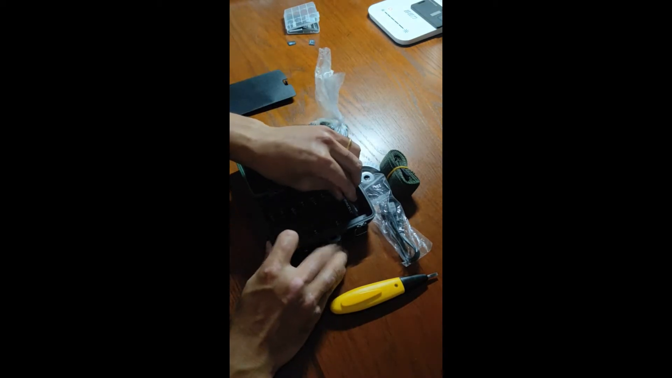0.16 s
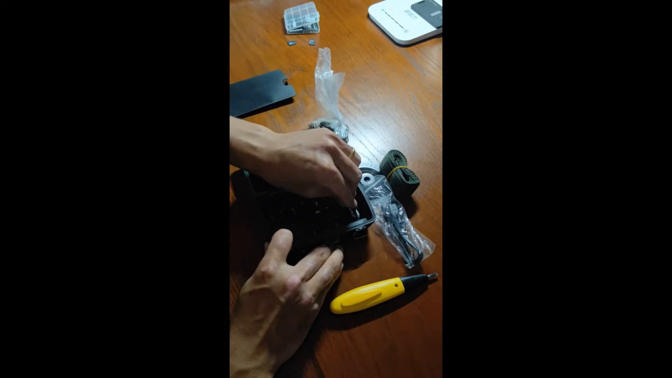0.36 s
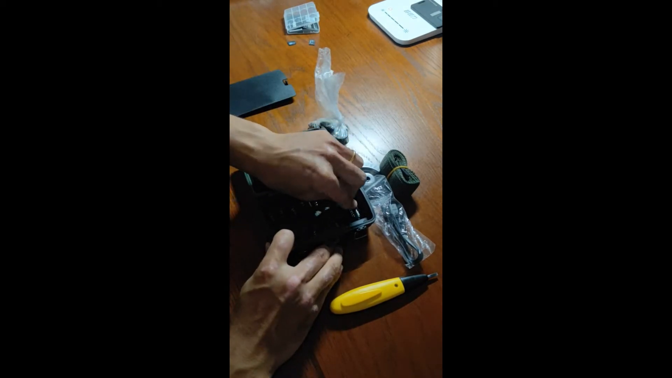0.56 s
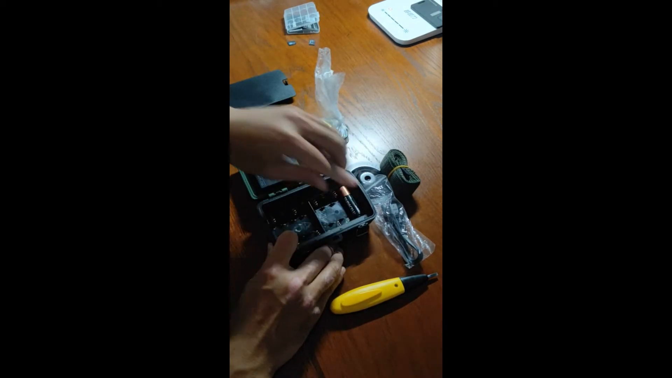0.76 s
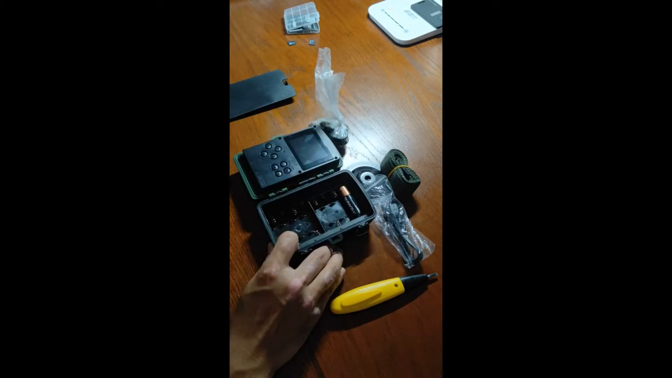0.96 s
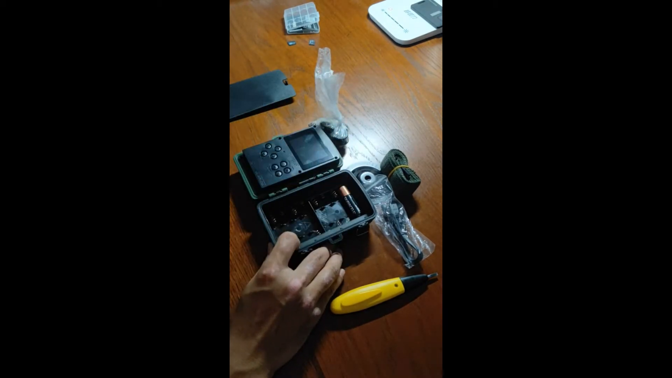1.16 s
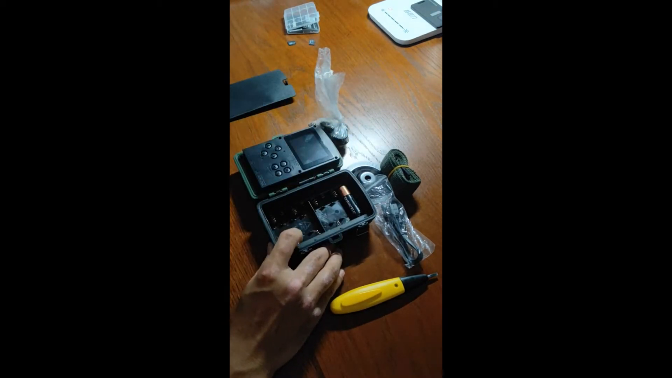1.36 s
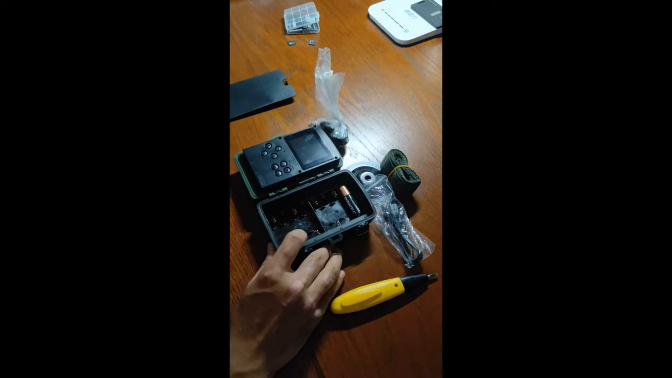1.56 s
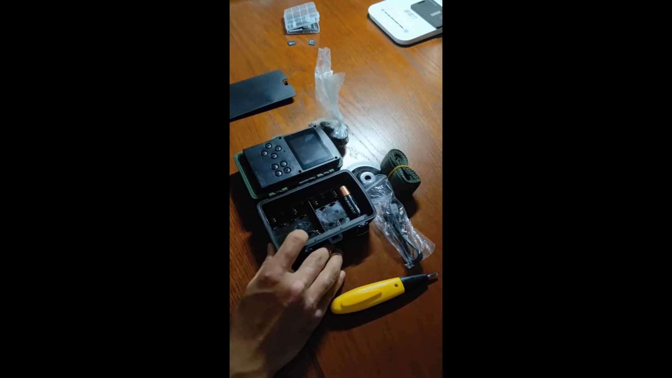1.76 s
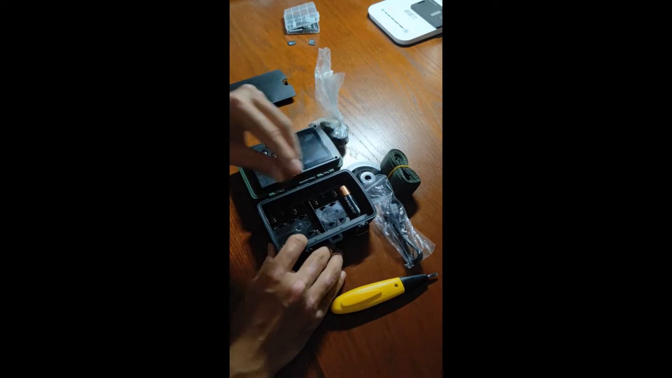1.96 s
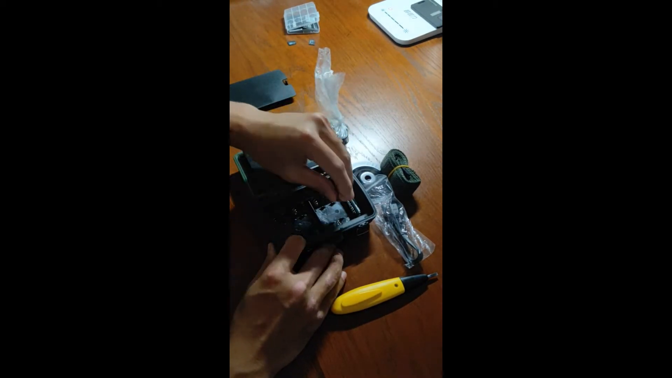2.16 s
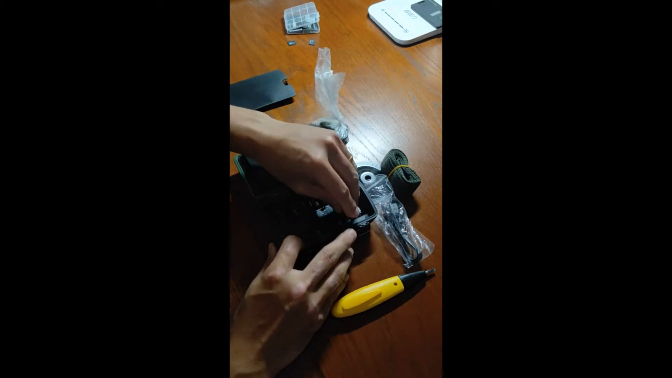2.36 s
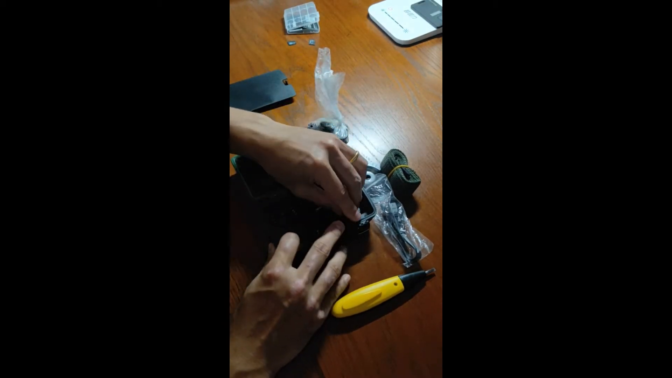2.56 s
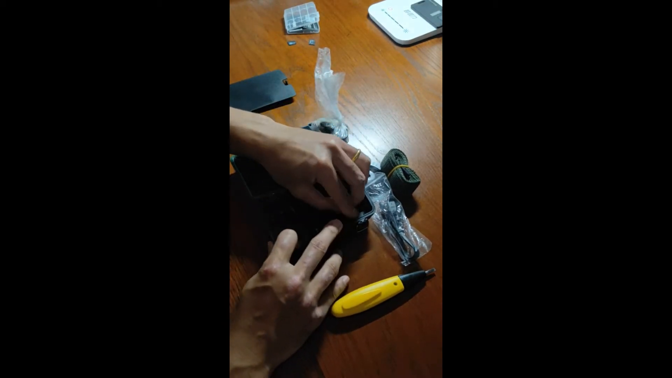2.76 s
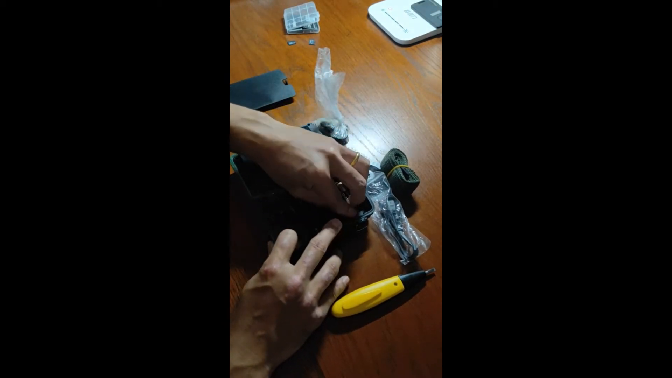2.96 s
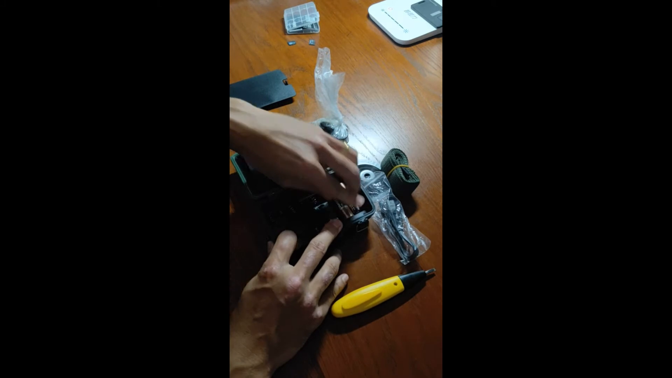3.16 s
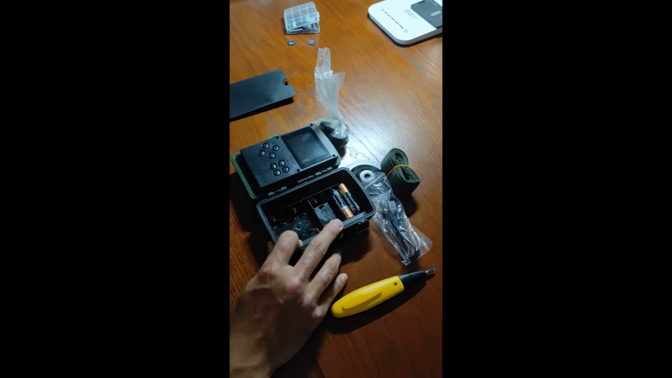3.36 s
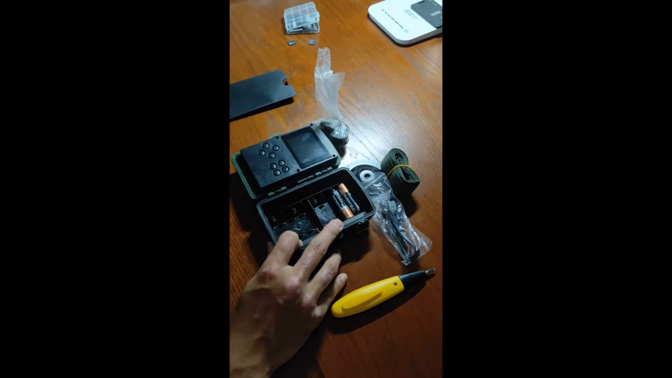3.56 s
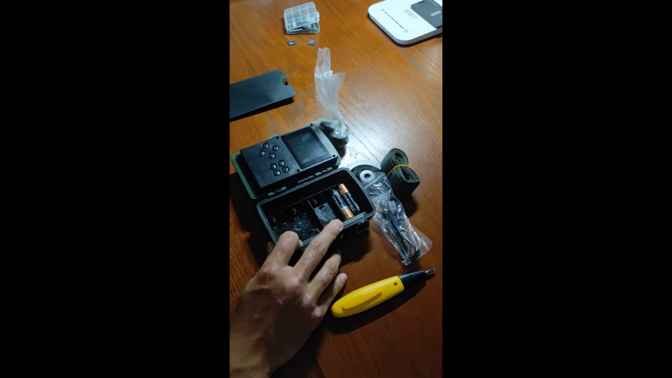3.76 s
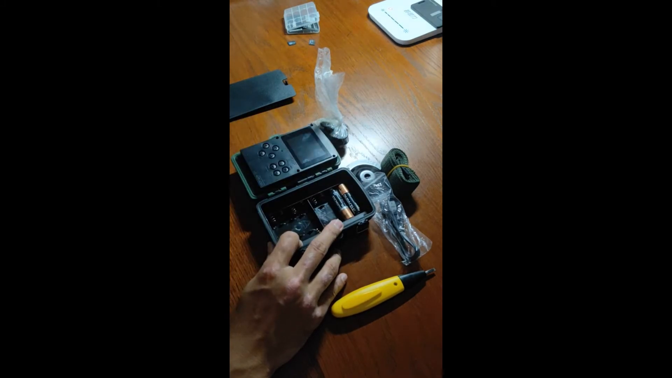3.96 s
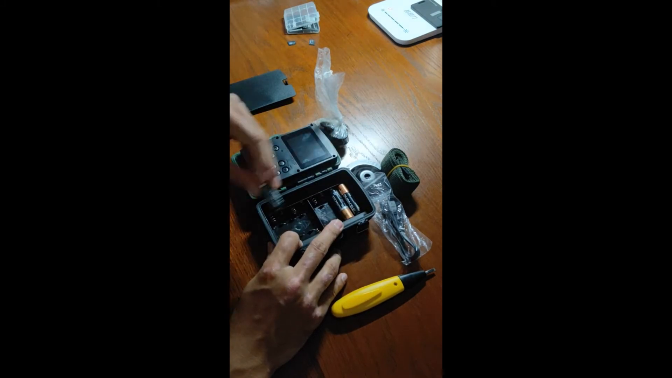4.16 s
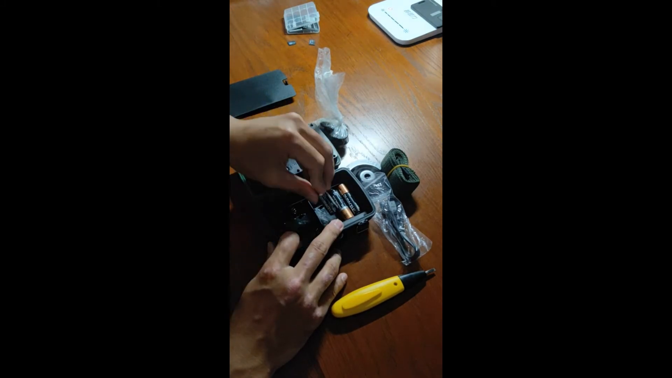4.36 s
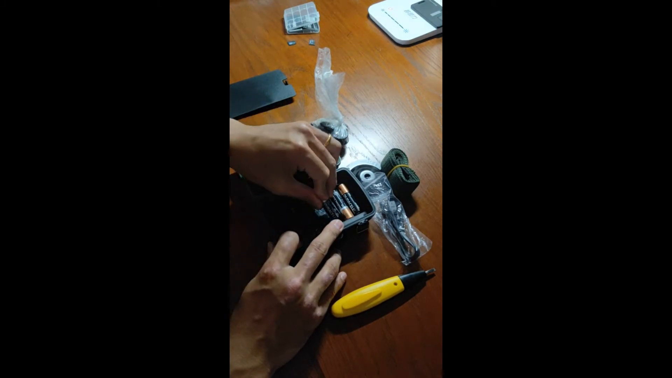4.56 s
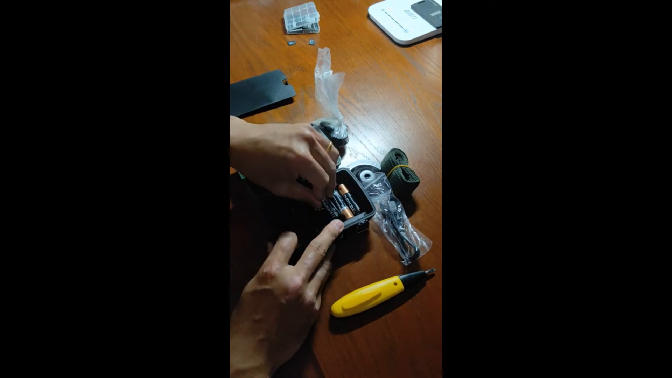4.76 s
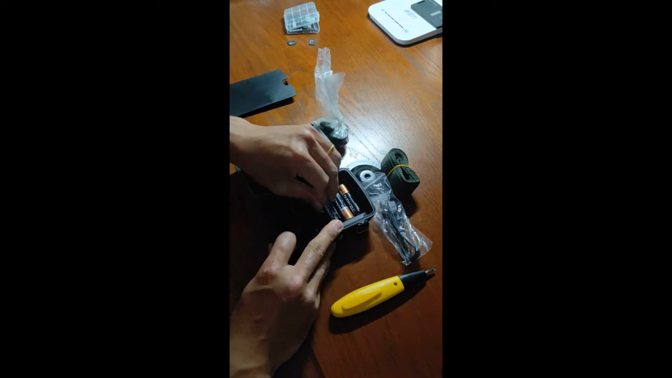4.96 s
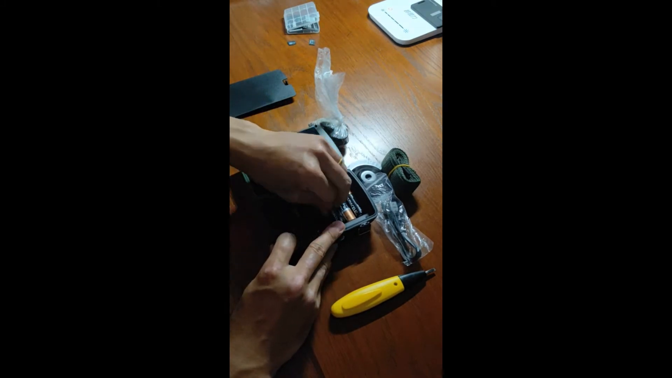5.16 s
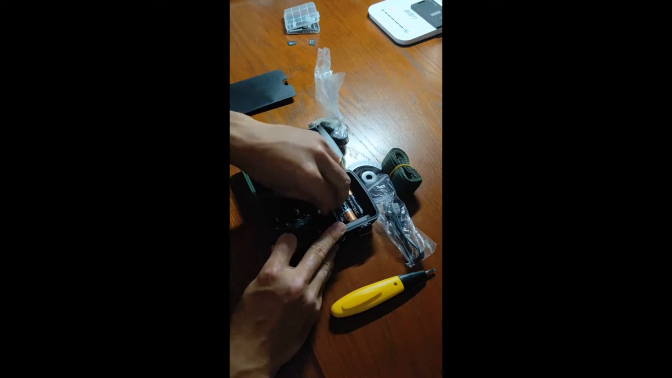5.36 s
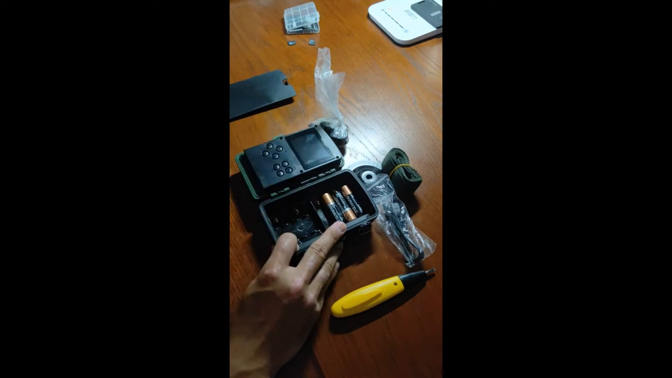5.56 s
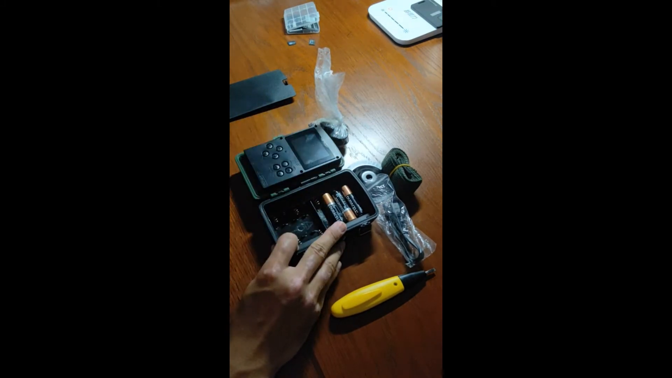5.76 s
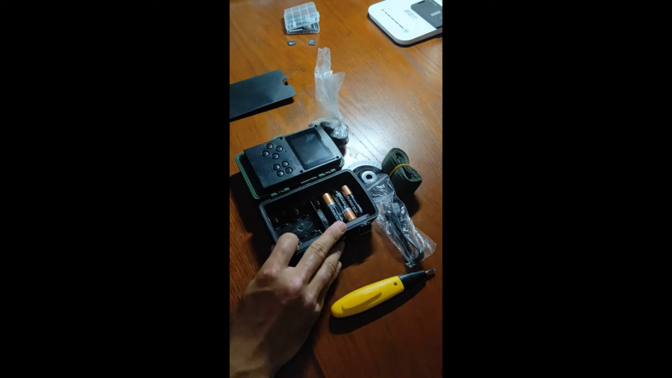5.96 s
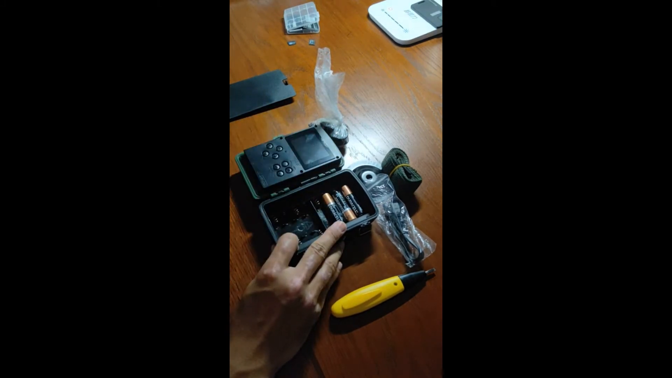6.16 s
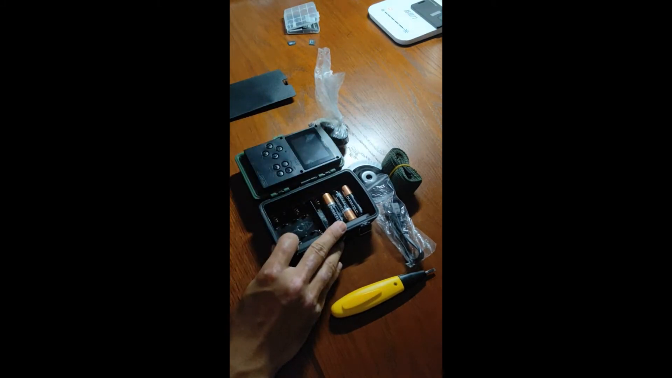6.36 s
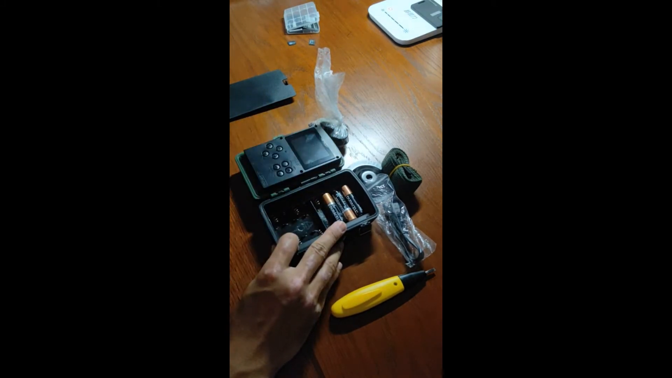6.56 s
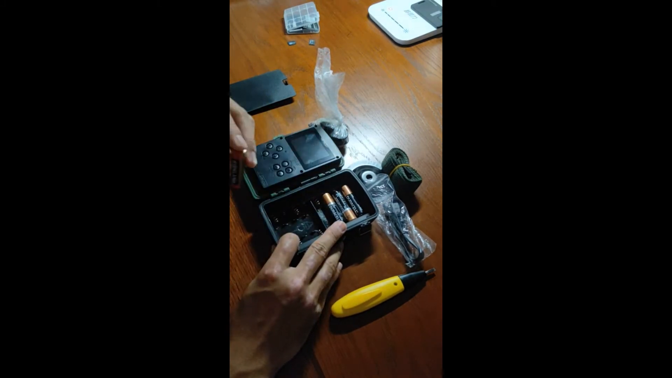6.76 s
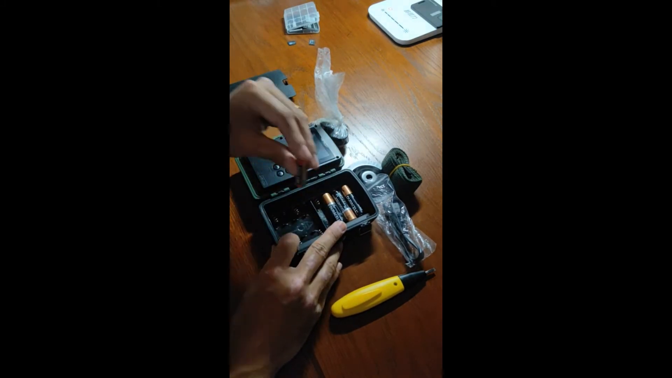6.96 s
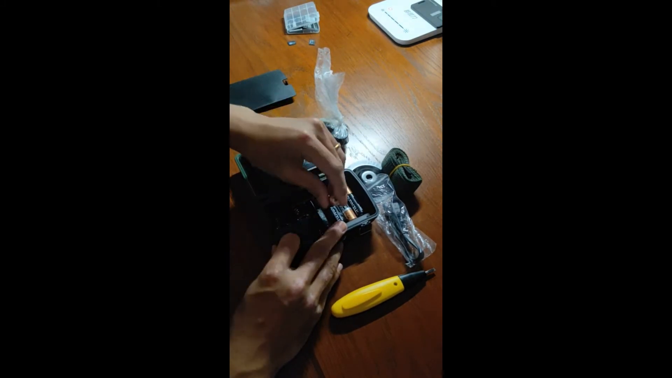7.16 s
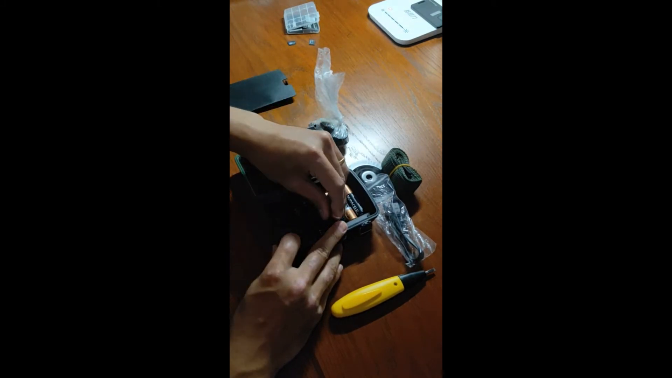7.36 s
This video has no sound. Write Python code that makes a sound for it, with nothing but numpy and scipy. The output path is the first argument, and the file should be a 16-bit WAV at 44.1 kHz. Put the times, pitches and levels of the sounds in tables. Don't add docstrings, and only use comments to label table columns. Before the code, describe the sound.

A quiet small room with low rumble, faint appliance hum and slight hiss, captured close in stereo with softened treble. From 0.1 to 0.45 s, a cell rattles into a hollow plastic case: a firm clack at 0.19, a duller knock at 0.42, with fingertip rubbing between. Faint touches around 0.6 and 1.6, otherwise nearly still until 2.2. Light nudges and rubs lead to clicks at 2.58 and 2.73, then the loudest event at 2.94: a hard, bright, stepped snap with a brief metallic ring and short room echo. Soft fumbling at 3.15, small clacks at 3.62 and 3.83, then quiet. From 4.5 to 5.1 several modest clicks and hollow knocks, strongest at 4.82 and 5.07. A low thump at 5.7, a small tick at 6.17, a pause, then two firm plastic clacks at 7.15 and 7.3.

```python
import sys
import numpy as np
from scipy import signal
from scipy.io import wavfile

SR = 44100
rng = np.random.default_rng(int(sys.argv[2]) if len(sys.argv) > 2 else 0)


def gain_from_db(level_db):
    decades = np.asarray(level_db, float) / 20
    return 10 ** decades


def wav_out(sig):
    wavfile.write(sys.argv[1], SR, np.round(np.clip(np.atleast_2d(sig).T, -1, 1) * 32767).astype(np.int16))


N = 326781

# (pitch [Hz], level [dB])
HUM = [(118.4, -71), (242.2, -85.5), (312.2, -90), (441.4, -81.5)]
# (pitch [Hz], level [dB per Hz])
AIR = [(12, -30), (20, 5.5), (74, 0), (126, -13.5), (146, -4), (174, -13.5), (236, -13), (380, -14.5),
       (442, -16.5), (502, -19.5), (851, -19), (1370, -28.5), (7050, -33.5), (8200, -28.5), (10700, -77),
       (18000, -120)]
AIR_DB = -67.5
# (pitch [Hz], likeness [0 to 1])
AIR_LIKENESS = [(40, 0.18), (120, 0.92), (300, 0.19), (430, 0.63), (620, 0.71), (1000, 0.041),
                (8000, 0.0086)]
# (pitch [Hz], likeness [0 to 1])
NEAR_LIKENESS = [(30, 0.21), (60, 1), (130, 0.99), (400, 0.93), (520, 0.58), (700, 0.21), (8000, 0.0079)]
PORT_LAG_CYCLES = 0.32
# (pitch [Hz], time to fall 60 dB [s], level [dB])
ROOM = [(98.4, 0.59, -18), (400, 0.33, -13), (1120, 0.42, -10.5), (2430, 0.3, -8), (6490, 0.37, -8.5)]

# (strongest at [s], press level [dB], skin slide level [dB], length [s])
STROKES = [(0.182, -67.5, -78.5, 0.1), (0.309, -54.5, -82, 0.19), (0.632, -58.5, -80, 0.083),
           (1.58, -71, -93, 0.72), (2.206, -54.5, -70, 0.043), (2.35, -61.5, -93, 0.14),
           (2.588, -61, -80, 0.2), (2.883, -63.5, -91.5, 0.22), (3.209, -61, -74.5, 0.13),
           (3.608, -52, -83.5, 0.033), (3.754, -65.5, -83.5, 0.23), (4.535, -70, -77.5, 0.1),
           (4.899, -62, -87.5, 0.49), (5.095, -51, -70, 0.093), (5.321, -66, -96, 0.14),
           (5.848, -66.5, -87, 0.52), (6.21, -62, -90, 0.12), (7.347, -54.5, -78.5, 0.086)]
RISE_DB, EASE_DB = 13, 13
# (pitch [Hz], level [dB], time to fall 60 dB [s])
RIBS = [(1612, -31, 0.012), (1895, -41, 0.036), (2700, -37, 0.0037), (3490, -31.5, 0.0092),
        (4800, -50, 0.008)]

# (time [s], treble level [dB], dullness [dB], bright spot [Hz])
CLICKS = [(.116, -62.5, -6.5, 5800), (0.178, -58, 4, 2250), (.187, -46, -1, 1700), (0.247, -55.5, -9, 5800),
          (0.4211, -42, -9.5, 5400), (.432, -69, -5, 5860), (0.608, -73, -6, 6940), (2.203, -81, 15, 1700),
          (2.225, -68, 2, 2320), (2.328, -70, -3, 5840), (2.576, -50.5, -5, 1600),
          (2.5814, -48.5, -7.5, 6900), (2.714, -58, -4.5, 7340), (2.7274, -48.5, -10.5, 5960),
          (2.9367, -26.5, -13.5, 7700), (2.9385, -24, -4.5, 4500), (2.9415, -30, -10, 5900),
          (2.95, -39, 3.5, 5300), (2.96, -42, -1, 5694), (3.609, -52, -19.5, 4180), (3.618, -45, -12, 6620),
          (3.833, -61, -2, 2010), (4.473, -72.5, 1.5, 6420), (4.512, -57, -5.5, 7840),
          (4.62, -63, -6, 3600), (4.744, -85, 6, 2000), (4.849, -63.5, -2, 3200), (4.922, -63.5, -10, 4500),
          (4.997, -72, -10, 6500), (5.0158, -66, -5, 5500), (4.632, -52, -14.5, 3640),
          (4.8147, -50.5, 7.5, 1550), (4.93, -64, 3.5, 3000), (5.053, -47.5, -4, 2640),
          (5.072, -36, -12, 6650), (5.083, -53, -4, 5220), (6.173, -49.5, -4, 2346),
          (7.1528, -44.5, -3.5, 5500), (7.162, -61, -15, 7000), (7.3038, -51.5, 1.5, 1760)]
CLICK_T60_S, SOFT_T60_S, SOFT_BELOW_DB = 0.034, 0.056, -48
AWAY_DB, KEEN_HZ = -14, 3330
SPOT_ROOM_SHARE = 0.4

# (time [s], level [dB], pitch [Hz])
STEEL = [(0.33, -76, 5800), (0.42, -44, 5350), (2.33, -64, 5700), (2.3, -66, 6400), (2.725, -38, 6300),
         (2.727, -35, 5940), (2.9385, -22, 4550), (2.9405, -23, 7500), (2.9415, -27, 5900),
         (7.153, -45, 6600), (7.153, -43.5, 3500), (7.154, -47, 1740), (7.167, -56, 5000),
         (3.617, -56, 1560), (3.835, -60, 1800), (2.65, -56, 1030), (4.817, -52, 3500), (2.6, -46, 7400),
         (.1885, -43, 1100), (.19, -42, 700), (.4225, -33, 380), (1.96, -66, 1590), (2.22, -61, 4800),
         (2.468, -61, 670), (2.7, -62, 705), (2.94, -39, 1400), (3.2, -57, 580), (3.66, -58, 540),
         (3.8345, -37.5, 567), (4.817, -45, 1940), (5.692, -51, 535), (5.739, -53, 1110),
         (2.949, -29, 5330), (7.153, -44, 5400), (7.3045, -40, 1750), (7.306, -48, 2400),
         (4.775, -79.5, 6450), (5.2, -71, 6450), (4.82, -54.5, 6100), (7.307, -54, 6700),
         (3.619, -44.5, 5000), (3.618, -35.5, 6740), (4.512, -50.5, 7540), (4.632, -45.5, 3530),
         (4.816, -47, 2300), (4.8155, -33.5, 1510), (5.075, -41, 1470), (6.175, -67.5, 2480),
         (6.198, -52, 6900), (6.255, -69, 7000), (7.309, -38.5, 316), (7.154, -46.5, 330),
         (4.819, -40, 440), (4.826, -42, 430), (.4225, -56, 4500), (6.174, -53, 4750), (4.936, -45, 440),
         (.56, -56, 680)]
STEEL_T60_S, STEEL_ROOM_DB = 0.023, -8.5
PANEL_CYCLES, SWELL_CYCLES = 35, 1.6

LATCH_S = [
    2.9391,
    2.9406,
    2.9477,
    2.9534,
]
LATCH_DB = [
    -36,
    -25.5,
    -34,
    -38.5,
]
# (pitch [Hz], level [dB], time to fall 60 dB [s])
LATCH_MODES = [(263, -11.5, 0.037), (130.8, -12.5, 0.03), (418.6, 1.5, 0.064), (694, -4, .055),
               (735, -6, 0.056), (800, -8, .05), (860, -4, 0.05), (975, -4, 0.04146), (1174, -6, 0.02),
               (1276.4, -4.5, .03), (2000, -16, .02), (2280, -16, 0.022)]

# (time [s], strength [dB], weight passed down [dB], hardness [dB], struck spot [Hz])
BLOWS = [(0.123, -58.5, 9.5, -3, 465), (.18, -43.5, 9, -6, 298), (.188, -27.5, -5.5, -7, 977),
         (.215, -45, -1.5, -11, 1000), (0.248, -52, -2, 7, 340), (.422, -31.5, -10, -14, 420),
         (2.275, -49, 2.5, -13, 315), (2.576, -35.5, -3.5, -16, 356), (2.725, -44.5, 6.5, -9, 400),
         (2.9385, -47, -1.5, 3, 706), (2.941, -39.5, 4.5, -15, 420), (2.963, -32, -1, -20, 910),
         (3.042, -42.5, -18, -6, 789), (3.614, -51.5, 1.5, -6.5, 581), (3.835, -49.5, -4, -8, 540),
         (4.513, -53.5, 8.5, -10.5, 316), (4.636, -45.5, 2.5, -16.5, 324), (4.8144, -38.5, -5.5, -5, 437),
         (5.054, -42, -5, -3, 433), (5.075, -35, -7, -4, 435), (5.691, -48, 10, -23, 149.2),
         (6.174, -48, -4.5, -5.5, 542), (7.153, -39, -4, -21.5, 338.4), (7.305, -37, -5.5, -13.5, 320)]
# (time [s], strength [dB], weight passed down [dB], struck spot [Hz])
NUDGES = [(.1, -58.5, 2, 600), (0.147, -59, 5, 300), (0.173, -54, 4, 236), (2.59, -48.5, 4, 347),
          (2.738, -49.5, 2, 238.6), (4.824, -47.5, -2, 426), (.55, -68.5, 13.5, 374),
          (0.611, -60.5, 1, 790), (1.559, -65, -8, 590), (1.621, -62, -17, 566), (2.193, -68, 8, 600),
          (2.205, -56, 5, 580), (2.326, -57, 4, 306), (2.34, -56, 6, 540), (0.444, -50, 7.5, 670),
          (2.467, -59.5, -1.5, 420), (2.515, -60, 5, 430), (2.61, -59, 9.5, 294), (2.713, -52, -3, 417),
          (2.905, -62, 4, 860), (3.153, -46, 2.5, 689), (3.181, -48.5, -4.5, 301.4),
          (3.632, -45.5, -1.5, 610), (3.655, -48.5, -0.5, 584), (3.684, -73, 24, 428.3),
          (4.472, -66.5, 10, 315), (4.715, -59, 4, 442), (4.748, -62.5, -0.5, 530), (4.858, -45, 1, 480),
          (4.931, -45.5, -6, 445), (5.016, -59, 2, 600), (5.329, -53, -3, 438), (5.363, -60.5, 8, 420),
          (5.705, -52, 13, 302.5), (5.738, -48, -1, 312), (0.202, -51, 0.5, 670), (.232, -48.5, 4, 700),
          (.268, -52.5, 4, 890), (.282, -56.5, 1.5, 300), (.306, -53.5, -4.5, 800), (2.255, -63, 6, 430),
          (2.303, -60.5, 1.5, 310), (2.407, -62.5, 3, 400), (2.442, -59, 3.5, 430), (2.548, -69, 3, 504),
          (3.675, -55.5, 8, 303), (3.702, -56.5, 6.5, 563), (3.809, -65, 1.5, 705),
          (5.698, -54.5, -0.5, 560)]
NUDGE_HARDNESS_DB, NUDGE_TICK_DB = -15.5, -24
RATTLE_S, RATTLE_DB = 0.006, -8
GRIP_DETUNE = 0.02
TABLE_SHARE, TABLE_DB, HOLLOW_SHARE, HOLLOW_DB = 1.3, -17.5, 0.88, -10
# (pitch [Hz], level [dB], time to fall 60 dB [s])
TABLE = [(61.5, -11, 0.48), (88.5, -6, 0.2), (128.5, 4.5, 0.16), (139, -1, 0.26), (209.5, -1.5, 0.2),
         (231, -1.5, 0.18)]
# (pitch [Hz], level [dB], time to fall 60 dB [s])
HOLLOW = [(305.7, -4, 0.15), (349.8, -1.5, 0.089), (398, -5, 0.052), (420, -1.5, 0.053), (445, -4.5, 0.11)]
# (pitch [Hz], level [dB], time to fall 60 dB [s])
CASE = [(530, -9.5, 0.094), (587, 0, 0.069), (651, -4.5, 0.064), (707, -3.5, 0.084), (790, -1, 0.061),
        (898, -7, 0.066), (952, -6, 0.055)]
# (pitch [Hz], level [dB], time to fall 60 dB [s])
SHELL = [(1113.6, -6.5, 0.035), (1255, -7, 0.016), (1320, -2, 0.0056), (1468, -4.5, 0.021)]

CUTOFF_HZ, SPILL_DB, HISS_DB = 8750, -57, -100


def at_hz(points, hz, column=1):
    points = np.array(points)
    return np.interp(np.log(hz), np.log(points[:, 0]), points[:, column])


def rms_one(x):
    return x / np.sqrt(np.mean(x ** 2) + 1e-20)


def drift(rate):
    r = np.exp(-80 * np.pi * rate / SR)
    slow = signal.lfilter([1], [1, -2 * r, r * r], rng.standard_normal(N // 40 + 2002))[2000:]
    return np.interp(np.arange(N) / 40, np.arange(len(slow)), rms_one(slow))


def ring(push, hz, t60):
    r = np.exp(-np.log(1000) / (t60 * SR))
    w = 2 * np.pi * hz / SR
    return signal.lfilter([0, np.sin(w)], [1, -2 * r * np.cos(w), r * r], push + 1e-18)


def butter(x, order, hz, kind="low"):
    return signal.sosfilt(signal.butter(order, hz, kind, fs=SR, output="sos"), x)


def spread(mid, side, hz, likeness):
    alike = np.clip(at_hz(likeness, hz), 0, 1)
    return np.sqrt(1 + alike) * mid + np.sqrt(1 - alike) * side * [[1], [-1]]


def ports(mid, side, hz):
    late_side = np.roll(side, int(PORT_LAG_CYCLES * SR / hz))
    return spread(mid, late_side, hz, NEAR_LIKENESS)


def bands(likeness, size):
    edges = 18 * 2 ** np.arange(0, 9.1, 0.5)
    white = rng.standard_normal((2, 2, size))
    for k, (low, high) in enumerate(zip(edges, edges[1:])):
        centre_hz = np.sqrt(low * high)
        mid, side = butter(white[k % 2], 2, [low, high], "band")
        yield centre_hz, spread(mid, side, centre_hz, likeness)


def background():
    out, t = 0, np.arange(N) / SR
    for hz, noise in bands(AIR_LIKENESS, size=N):
        lumps_db = 9.5 * np.tanh(drift(5.4)) / (1 + hz / 150)
        out = out + noise * gain_from_db(at_hz(AIR, hz) + lumps_db)
    out = rms_one(out) * gain_from_db(AIR_DB + 2.0)
    for hz, db in HUM:
        turn = 2 * np.pi * hz * t + 0.51 * drift(1.5)
        out += np.sqrt(2) * gain_from_db(db + 0.97 * drift(5.3)) * np.sin(turn)
    return out


def room(x):
    t = np.arange(int(0.6 * SR)) / SR
    echo = 0
    for hz, noise in bands(NEAR_LIKENESS, size=len(t)):
        t60 = at_hz(ROOM, hz)
        fall = gain_from_db(at_hz(ROOM, hz, column=2) - 60 * t / t60)
        echo = echo + noise * fall / np.sqrt(t60 * SR / 14)
    echo = echo * np.clip((t - 0.004) / 0.0045, 0, 1)
    return signal.fftconvolve(x, echo, axes=1)[:, :N]


def hands():
    t, power = np.arange(N) / SR, 0
    for s, press_db, slide_db, length in STROKES:
        lengths = (t - s) / length
        swell = gain_from_db(np.minimum(RISE_DB * lengths, -EASE_DB * lengths))
        power = power + swell ** 2 * gain_from_db([[press_db], [slide_db]]) ** 2
    return np.sqrt(power)


def skin_hiss(slide):
    skin = butter(rng.standard_normal((2, N)), 2, 1500, "high")
    walls = sum(gain_from_db(db) * ring(skin, hz, t60) for hz, db, t60 in RIBS)
    return rms_one(skin + 0.24 * walls) * slide * gain_from_db(5.5 + 2 * drift(30))


def clicks():
    out, t = np.zeros((3, N)), np.arange(SR // 10) / SR
    ranges_hz = [(4000, 9500), (1500, 2600), (2600, 4000)]
    nudge_ticks = [(s, db + NUDGE_TICK_DB, 4.0, 1800) for s, db, *_ in NUDGES]
    for s, top_db, dull_db, spot_hz in CLICKS + nudge_ticks:
        away_db = AWAY_DB * (1 - np.exp(-(np.log(spot_hz / KEEN_HZ) / 0.23) ** 2))
        levels_db = top_db, top_db + dull_db, top_db + 0.5 * dull_db + away_db
        soft = 1 / (1 + gain_from_db(max(top_db, top_db + dull_db) - SOFT_BELOW_DB))
        t60 = CLICK_T60_S + soft * (SOFT_T60_S - CLICK_T60_S)
        fall = gain_from_db(-60 * t / t60) * np.minimum(1, 0.1 + t / (1e-4 + 0.0028 * soft))
        burst = 0
        for db, share_db, sign, edges_hz in zip(levels_db, [6, 12, 12], [1, 1, -1], ranges_hz):
            swarm = rng.standard_normal((3, len(t))) * gain_from_db(3 * rng.standard_normal((3, len(t))))
            swarm = rms_one(swarm) * fall
            swarm[2] = (t == 0) * sign * np.sqrt(np.sum(fall ** 2))
            burst = burst + gain_from_db(db + share_db) * butter(swarm, 2, edges_hz, "band")
        spot = 0.0041 * np.array([[1], [1], [SPOT_ROOM_SHARE]]) * ring(burst, spot_hz, 0.016)
        burst = burst + spot
        burst = burst + sum(gain_from_db(db) * ring(burst - spot, hz, rib_t60) for hz, db, rib_t60 in RIBS)
        i = int(s * SR)
        out[:, i:i + len(t)] += burst[:, :N - i]
    return out


def steel():
    out, t = np.zeros((2, N)), np.arange(SR // 11) / SR
    for (s, db, hz), turn in zip(STEEL, rng.random((len(STEEL), 3, 2, 1))):
        i = int(s * SR)
        bunch_hz = hz * np.array([0.965, 1, 1.03])[:, None, None]
        port_turn = [[0], [0.25 * (hz > 500)]]
        tones = np.sin(2 * np.pi * (bunch_hz * t + 0.12 * turn[:, :1] + port_turn)).sum(axis=0)
        fall = gain_from_db(db - 7 - 60 * t / max(STEEL_T60_S, PANEL_CYCLES / hz))
        swell = np.minimum(1, t * hz / SWELL_CYCLES)
        out[:, i:i + len(t)] += tones * fall * swell
    return out


def latch():
    out, start, size = np.zeros((2, N)), int(LATCH_S[0] * SR), SR // 4
    blow = np.zeros((2, size))
    blow[:, (np.array(LATCH_S) * SR).astype(int) - start] = gain_from_db(LATCH_DB)
    modes = [gain_from_db(db) * ports(*ring(blow, hz, t60), hz) for hz, db, t60 in LATCH_MODES]
    out[:, start:start + size] = sum(modes)
    return out


def knocks():
    nudges = [(s, db, weight_db, NUDGE_HARDNESS_DB, hz) for s, db, weight_db, hz in NUDGES]
    return np.transpose(BLOWS + nudges)


def body(modes, levels_db, soft_hz, press):
    out, (s, *_, spot_hz) = np.zeros((2, N)), knocks()
    rub = rng.standard_normal((2, N)) * press
    for hz, db, t60 in modes:
        push = np.zeros((2, 2, N))
        push[1] = rub
        grip = rng.integers(0, 2, len(s))
        near_db = 8.86 * np.exp(-(np.log(hz / spot_hz) / 0.18) ** 2)
        luck = rng.standard_normal((len(s), 8))
        at = ((s + 0.0015 * abs(luck[:, 4])) * SR).astype(int)
        mid_side_gain = gain_from_db(2 * luck[:, :2]) * np.sign(luck[:, 2:4])
        blow = gain_from_db(levels_db + near_db)[:, None] * mid_side_gain
        push[grip, :, at] += blow
        again = at + (RATTLE_S * SR * (0.5 + abs(luck[:, 5]))).astype(int)
        push[grip, :, again] += blow * gain_from_db(RATTLE_DB) * np.sign(luck[:, 6:])
        low = ring(push[0], hz * (1 - GRIP_DETUNE), t60)
        high = ring(push[1], hz * (1 + GRIP_DETUNE), t60)
        out += gain_from_db(db) * ports(*(low + high), hz)
    return butter(out, 2, soft_hz)


def camera():
    _, case_db, weight_db, hard_db, _ = knocks()
    press, slide = hands()
    press = press * gain_from_db(1.8 * drift(25))
    out = body(TABLE, case_db + TABLE_SHARE * weight_db + TABLE_DB, 690, press * gain_from_db(-44.5))
    out += body(HOLLOW, case_db + HOLLOW_SHARE * weight_db + HOLLOW_DB, 580, press * gain_from_db(-38.0))
    out += body(CASE, case_db - 11.0, 3400, press * gain_from_db(-40.5))
    out += body(SHELL, case_db + hard_db - 1.0, 1500, press * gain_from_db(-51.5))
    return out + skin_hiss(slide)


def scene():
    dull, sharp, rings = camera() + latch(), clicks(), steel()
    sent = dull + gain_from_db(STEEL_ROOM_DB) * rings
    to_room = sent[:1] + 0.5 * sent[1:] + gain_from_db(1.0) * sharp[2:]
    return dull + rings + sharp[:2] + room(to_room) + background()


def roll_off(x):
    return signal.sosfilt(signal.butter(12, 15800, fs=SR, output="sos"), x)


def record(dry):
    steep = signal.cheby2(12, 58, CUTOFF_HZ, fs=SR, output="sos")
    cut = signal.sosfilt(steep, dry) + gain_from_db(SPILL_DB) * dry
    cut = butter(0.3 * np.tanh(cut / 0.3), 6, 9800)
    hiss = gain_from_db(HISS_DB) * rng.standard_normal(dry.shape)
    return roll_off(cut + hiss)


dry = scene()
out = record(dry)
wav_out(out)
```